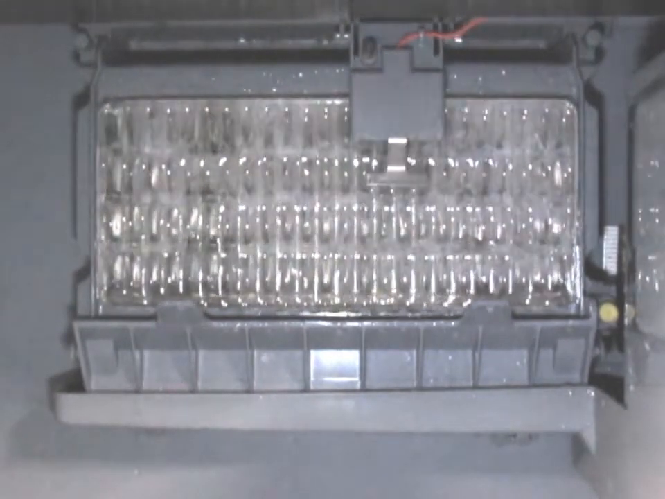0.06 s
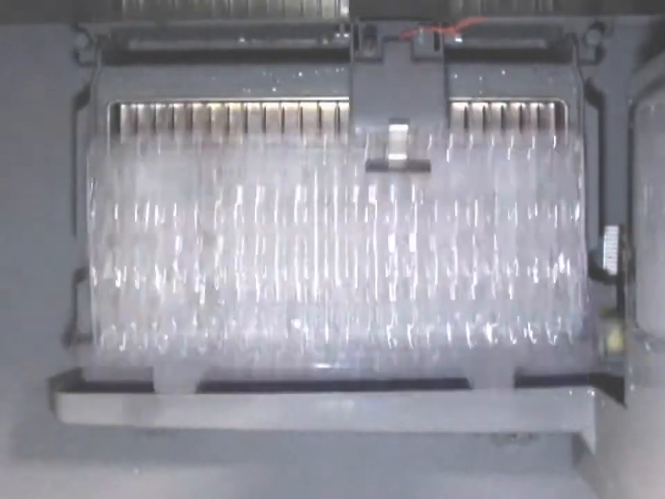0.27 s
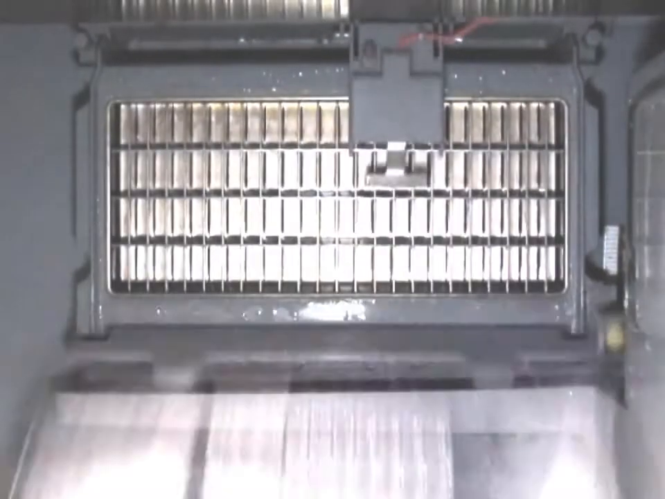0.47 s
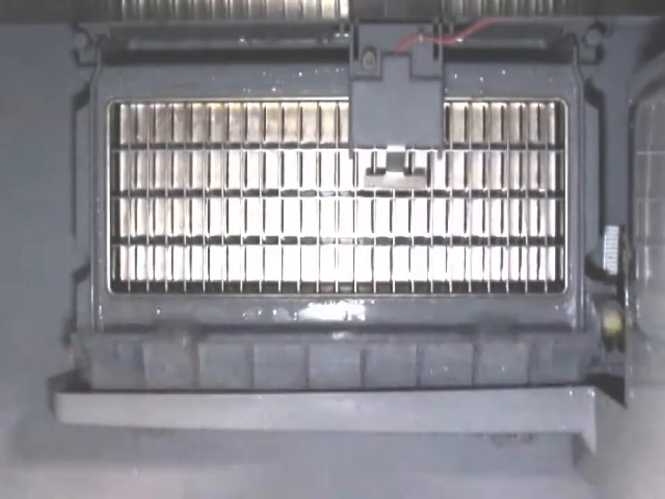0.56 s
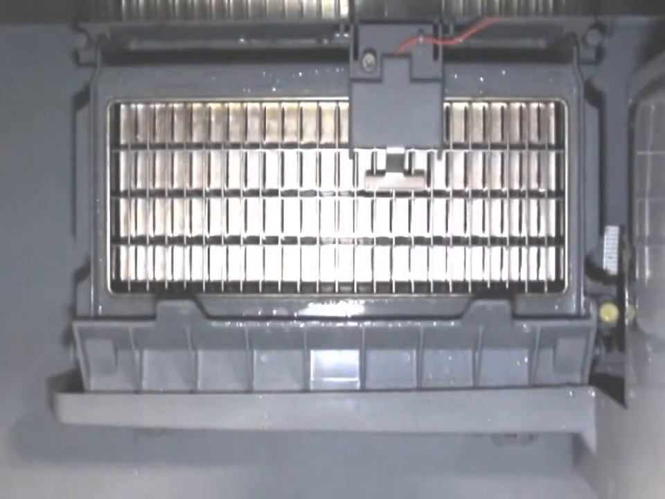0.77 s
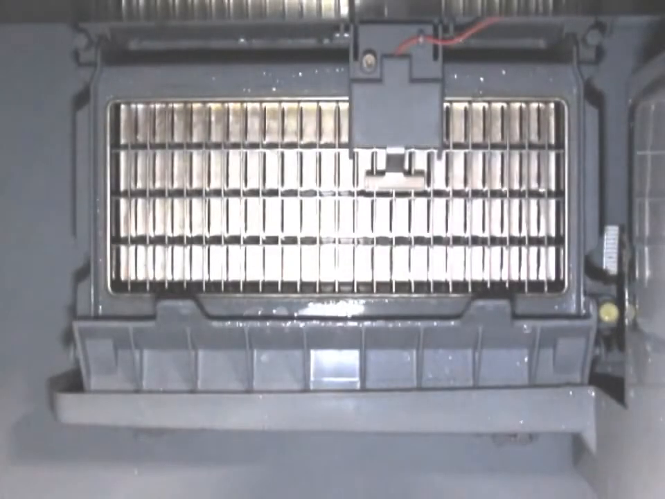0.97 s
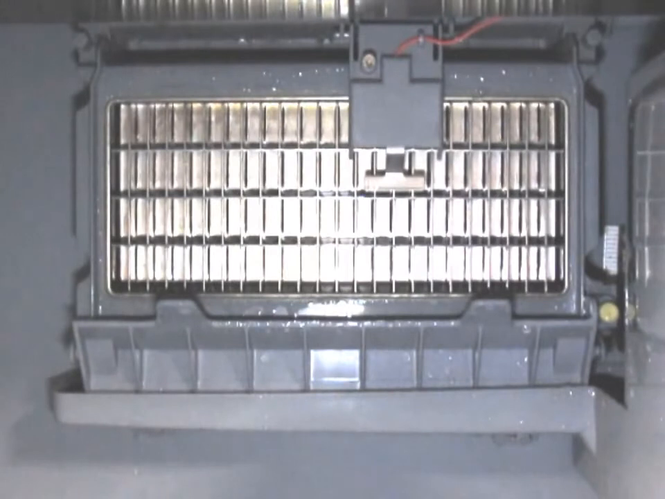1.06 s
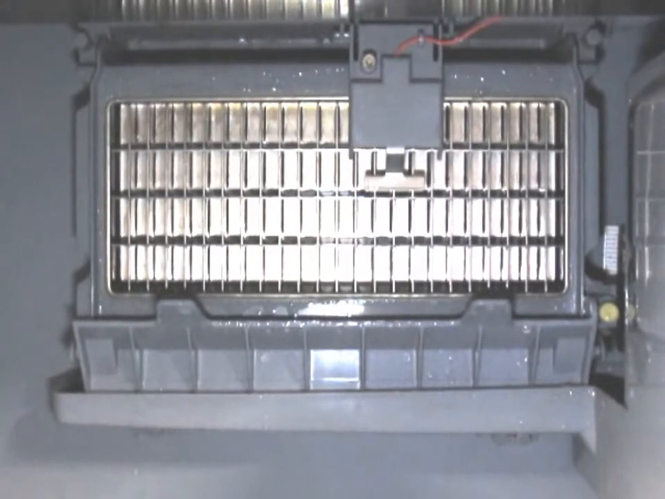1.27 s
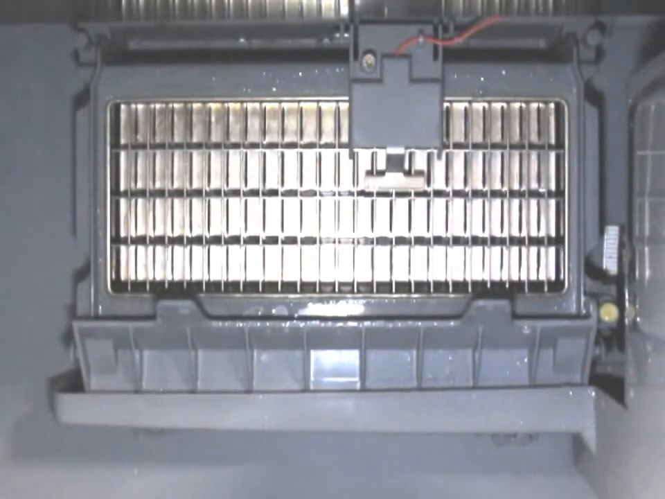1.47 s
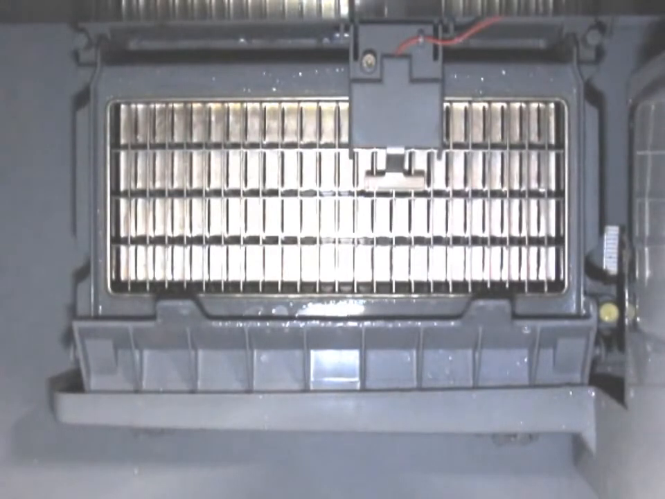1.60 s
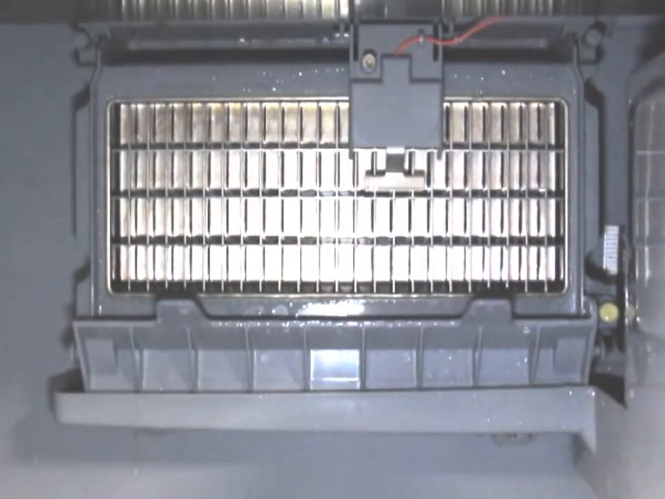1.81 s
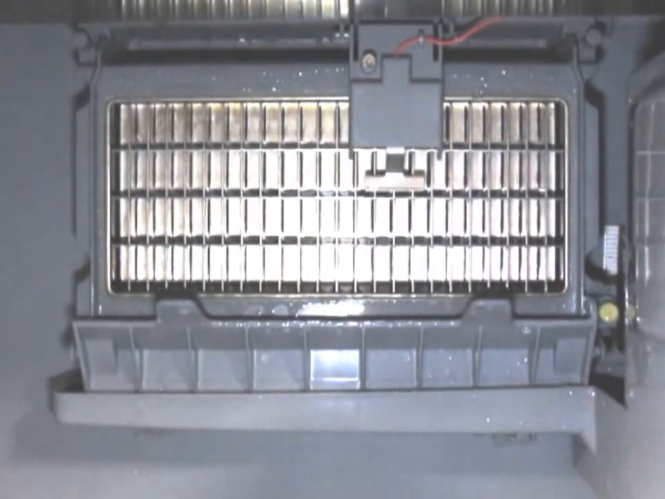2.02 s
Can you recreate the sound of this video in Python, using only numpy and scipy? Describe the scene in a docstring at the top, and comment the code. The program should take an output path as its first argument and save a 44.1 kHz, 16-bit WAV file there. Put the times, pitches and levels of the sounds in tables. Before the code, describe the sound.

Ice slab drops with hard cracks and hollow knocks, pieces rattling in a plastic bin, compressor humming.

```python
"""Inside an ice machine a slab of ice slides off its grid, knocks the flap and breaks up in the plastic bin.
Each blow is a noise crack, a ringing piece, a knock on the bin's resonances and a boom of two cabinet panels;
random contacts and short rings make the shower of clinking pieces. A compressor hums and buzzes throughout,
built from multiples of its shaft speed over hiss, beside two faint wavering tones made of narrow noise bands
and a thin fluttering tone that swells once. An automatic gain drops at the crash and creeps back."""
import sys
import numpy as np
from scipy import signal
from scipy.fft import rfft, irfft, next_fast_len
from scipy.io import wavfile
from scipy.ndimage import uniform_filter1d, map_coordinates

SR = 44100
rng = np.random.default_rng(int(sys.argv[2]) if len(sys.argv) > 2 else 0)


def generate_wav(sig):
    """Save sig (samples, or channels by samples) to the path in sys.argv[1] as 16-bit PCM at SR."""
    pcm = np.round(np.clip(np.atleast_2d(sig).T, -1, 1) * 32767).astype(np.int16)
    wavfile.write(sys.argv[1], SR, pcm)


N = 90404
T = np.arange(N) / SR  # time [s]
SIZE_DB = 4  # spread of impact sizes, standard deviation

# Resonances of the plastic bin: (frequency [Hz], width [Hz], level [dB])
BIN_MODES = [(246, 89, -3.5), (353.3, 22.6, 4.5), (519, 112, -1.5), (647.4, 38, 4.5), (822, 233, 1),
             (1050, 105, 2.5), (1211, 92, 2.5), (1440, 110, -4.5), (1480, 187, -4), (1777, 207, -1),
             (2010, 210, -8.5)]


def amp(db):
    """Amplitude factor of a level in dB."""
    return 10 ** (np.asarray(db) / 20)


def unit(x):
    """x scaled to rms 1."""
    return x / np.sqrt(np.mean(x ** 2) + 1e-20)


def along(points, hz):
    """Interpolates (Hz, value) points on a log frequency axis."""
    f, v = np.transpose(points)
    return np.interp(np.log(hz + 1), np.log(f + 1), v)


def filtered(x, response):
    """x shaped by a complex response of frequency, zero-padded by at least half a second."""
    m = next_fast_len(N + SR // 2)
    return irfft(rfft(x, m) * response(np.fft.rfftfreq(m, 1 / SR)), m)[..., :N]


def body(modes):
    """Causal response of a resonant body: damped modes (Hz, width, dB) summed with alternating sign."""
    def response(f):
        total = 0
        for k, (centre, width, db) in enumerate(modes):
            damping = 1j * f * width
            total = total + (-1) ** k * amp(db) * damping / (centre * centre - f * f + damping)
        return total
    return response


def colour(points):
    """Causal (minimum-phase) response with the given (Hz, dB) shape."""
    def response(f):
        cepstrum = irfft(np.log(np.maximum(amp(along(points, f)), 1e-6)))
        # fold the cepstrum onto positive time, so that nothing sounds before its impulse
        cepstrum[1:len(cepstrum) // 2] *= 2
        cepstrum[len(cepstrum) // 2 + 1:] = 0
        return np.exp(rfft(cepstrum))
    return response


def spread(a, b, alike):
    """Left and right as sum and difference of a and b, weighted by the likeness at each frequency."""
    def turn(hz):
        return np.arccos(np.clip(along(alike, hz), -1, 1)) / 2

    def weights(hz):
        return np.array([np.cos(turn(hz)), np.sin(turn(hz))])

    mid, side = filtered(np.array([a, b]), weights)
    return np.array([mid + side, mid - side])


def compressor():
    """A turning shaft sounds at multiples of its speed: low hum, a comb of buzz and whine, over steady hiss."""
    shaft_hz = 58.4  # mean speed, turns per second
    hum_db, buzz_db, whine_db, air_db = -54, -63.5, -82, -55.5
    whine_orders = [60, 75, 90]  # multiples of the shaft speed
    buzz_scatter_db = 6
    # Hum: (multiple of the shaft speed, level [dB])
    hum_orders = [(1, 6.5), (2, 2), (3, 2), (4, -3.5), (5, -26), (6, -9), (7, 1), (8, 2.5), (10, -10)]
    # Valve buzz, relative spectrum: (frequency [Hz], level [dB])
    buzz_spectrum = [(620, 0), (900, 3), (1200, -8), (1700, 7.5), (2100, -19), (3500, -5), (4700, -23),
                     (5300, -5), (6600, -3), (7400, -5), (7900, -46)]
    # Steady hiss of the machine, relative spectrum: (frequency [Hz], level [dB])
    air_spectrum = [(18, -43), (30, -0.5), (252, -7), (319, -12.5), (461, -7), (684, -20), (1190, -17.5),
                    (1720, -20), (2350, -31), (5900, -30.5), (7300, -26), (7800, -32.5), (12000, -33),
                    (13100, -32), (13700, -21), (14700, -30), (16000, -46)]
    # Stereo width of buzz and hiss: (frequency [Hz], left-right likeness)
    air_alike = [(60, 0.17), (240, 0.074), (950, 0.042), (3770, 0.81), (15000, 0.05)]

    drift = map_coordinates(rng.standard_normal(12), [T * 4])  # slow random wander
    phase = 2 * np.pi * (shaft_hz * T + 0.0016 * drift)
    hum = unit(sum(amp(db) * np.sin(k * phase + 2 * np.pi * rng.random()) for k, db in hum_orders))

    # one turn of the shaft as a waveform, read out again and again
    cycle = np.zeros(513, complex)
    k = np.arange(11, 262)
    scatter_db = buzz_scatter_db * rng.uniform(-0.75, 1, size=len(k))
    order_phase = 2 * np.pi * rng.random(len(k))
    cycle[k] = amp(along(buzz_spectrum, k * shaft_hz) + scatter_db) * np.exp(1j * order_phase)
    shape = irfft(np.pad(cycle, (0, 7680)))  # padded for a finely sampled turn
    buzz = unit(np.interp(phase / (2 * np.pi) % 1, np.arange(len(shape)) / len(shape), shape))
    wide_buzz = spread(buzz, np.roll(buzz, 277), air_alike)

    air = filtered(rng.standard_normal((2, N)), lambda hz: amp(along(air_spectrum, hz)))
    wide_air = unit(spread(*air, air_alike))

    whine = np.zeros(N)
    for order in whine_orders:
        flicker = amp(4 * map_coordinates(rng.standard_normal(20), [T * 8]))
        whine += flicker * np.sin(order * phase)
    return amp(hum_db) * hum + amp(whine_db) * whine + amp(buzz_db) * wide_buzz + amp(air_db) * wide_air


def wavering_tones():
    """Narrow bands of noise near 257 and 1214 Hz waver like faint tones."""
    # Wavering tones: (frequency [Hz], width [Hz], level [dB])
    tones = [(257, 46, -64), (1214, 18, -72.5)]
    out = np.zeros(N)
    for hz, width, db in tones:
        band = filtered(rng.standard_normal(N), lambda f: np.exp(-((f - hz) / width) ** 2))
        out += amp(db) * unit(band)
    return out


def thin_tone():
    """A thin tone of steady pitch flutters at random and swells once."""
    pitch_hz, level_db = 2580, -76
    swell_s, span_s = 1.5, 0.11  # time of the swell and its half-width
    flutter = amp(3.5 * map_coordinates(rng.standard_normal(80), [T * 35]))
    swell = 0.25 + np.exp(-((T - swell_s) / span_s) ** 2)
    return amp(level_db) * swell * flutter * np.sin(2 * np.pi * pitch_hz * T)


def contacts(per_s):
    """Random tiny impacts of uneven size and either sign, rms 1."""
    hit = rng.random(N) < per_s / SR
    return unit(hit * rng.choice([-1, 1], size=N) * amp(SIZE_DB * rng.standard_normal(N)))


def clinks():
    """Loose pieces ring briefly, each at its own pitch, higher ones dying sooner; rms 1."""
    per_s, cycles = 900, 45  # cycles: periods until a ring has fallen by 60 dB
    centre_hz, pitch_spread = 2873, 0.55  # spread in natural log of frequency
    draw = rng.standard_normal((2000, 2))[:int(per_s * N / SR)]
    start = rng.integers(0, N, size=2000)[:len(draw), None]
    t = np.arange(1200)  # samples since the contact
    hz = np.clip(centre_hz * np.exp(pitch_spread * draw[:, :1]), 700, 13000)
    fall = amp(SIZE_DB * draw[:, 1:] - 60 * t * hz / SR / cycles)
    onset = np.minimum(t / 40, 1)
    ring = fall * np.sin(2 * np.pi * hz * t / SR) * onset
    return unit(np.bincount((start + t).ravel(), ring.ravel())[:N])


def shower():
    """Many small contacts: chips hiss and clink, lumps excite the walls of the bin."""
    chips_per_s, lumps_per_s, clink_db = 3500, 1100, -1  # clinks relative to the chip hiss
    # Level of the shower over time: (time [s], small chips [dB], heavy lumps [dB])
    course = [(0.202, -64, -35), (0.214, -61, -17), (0.24, -36.5, -42.5), (0.266, -35, -31),
              (0.289, -54, -34), (0.297, -16.5, -15), (0.322, -74, -43), (.345, -44.5, -29.5),
              (0.38, -48, -36), (0.418, -28, -16), (0.432, -25, -33), (0.451, -59, -25.5), (0.47, -36, -28),
              (0.545, -51, -46), (0.554, -28, -19), (0.575, -46.5, -36.5), (0.599, -20, -16),
              (0.667, -33.5, -24.5), (.72, -29, -24), (.755, -28, -25.5), (.81, -34.5, -27),
              (.85, -38.5, -29.5), (0.926, -44, -34), (0.954, -34, -34), (0.984, -28, -33.5),
              (1.008, -44.5, -38.5), (1.03, -40, -51), (1.071, -55.5, -48.5), (1.15, -64.5, -64),
              (1.26, -73.5, -78)]
    # Hiss of the chips, relative spectrum: (frequency [Hz], level [dB])
    chip_spectrum = [(530, -30), (900, -7.5), (1230, -8.5), (1490, -9), (1850, -3.5), (2330, -10),
                     (3300, -14), (9420, -22.5), (16000, -31)]
    s, chips_db, lumps_db = np.transpose(course)

    def level(db):
        return amp(np.interp(T, s, db, left=-120, right=-120))

    hiss = unit(filtered(contacts(chips_per_s), colour(chip_spectrum)))
    chips = hiss + amp(clink_db) * clinks()
    lumps = filtered(level(lumps_db) * contacts(lumps_per_s), body(BIN_MODES))
    steady_lumps = filtered(contacts(lumps_per_s), body(BIN_MODES))  # reference loudness
    return level(chips_db) * chips + lumps / np.std(steady_lumps)


def blows():
    """Each blow cracks, rings the struck piece, knocks the bin and pushes two panels of the cabinet."""
    piece_t60_s, piece_rise_s = 0.054, 0.007
    push_s, soft_s = 0.0017, 0.0019  # panel push; contact of a soft blow
    crush_s, splinter_db = 0.0051, -7.5  # rise of a soft crack; splinters relative to the crack noise
    tick_db, tick_t60_s = 5, 0.004  # first contact of the hardest blow, over its crack
    deep_panel, high_panel = (87, 26), (124, 22)  # (frequency [Hz], width [Hz])
    # Blows: (time [s], crack [dB], knock on the bin [dB], deep panel boom [dB], high panel boom [dB],
    # pitch of the struck piece [Hz], its ring [dB], crack t60 [s], hardness [0-1])
    hits = [ (0.2085, -19, -18.5, -13.5, -7, 397, -7, 0.077, 0),
            (0.2306, -9.5, -10.5, -55, -45, 280, -0.5, 0.046, 0.12),
            (0.2912, -6.5, -13, -19, -47, 541, -3.5, 0.048, 1),
            (0.3311, -40, -18.5, -17, -27, 624, -29, 0.086, 0.4),
            (0.3864, -21, -20, -26, -37, 940, -22, 0.089, 0.25),
            (0.3997, -17.5, -36, -58, -36, 517, -22, 0.058, 0.72),
            (.411, -10, -13.5, -16.5, -46, 330, -6.5, 0.092, 0.11),
            (0.432, -37, -28.5, -16.5, -31, 362, -10.5, 0.09, 0.3),
            (0.4595, -18, -14, -36, -20.5, 511.6, 0.5, 0.058, 0.44),
            (0.4817, -27, -13.5, -25.5, -27, 352, -11.5, 0.026, 0.1),
            (0.5071, -35.5, -18.5, -29, -27, 364, -20, 0.073, 0.46),
            (0.5515, -23.5, -15, -18.5, -43, 415, -10.5, 0.15, 0.73),
            (0.562, -21.5, -25.5, -18.5, -17.5, 850, -31, 0.21, 0.8),
            (.5895, -13.5, -12.5, -45, -44, 386, -33, 0.07, 0.36),
            (.608, -11, -29, -38, -18.5, 1241, -3.5, 0.054, 0.37),
            (0.6172, -24, -30, -39, -46, 337, -8.5, 0.034, 0.2),
            (0.6462, -22.5, -43, -20, -21, 290, -7, 0.18, 0.4),
            (0.7106, -18, -25, -47, -28, 1274, -8, 0.031, 0.2),
            (0.745, -17, -11.5, -51, -32, 800, -15, 0.044, 0.9),
            (0.7841, -19, -50, -29.5, -34, 1606, -15, 0.044, 1),
            (0.8203, -38, -24, -32.5, -46, 391, -7.5, 0.034, 0),
            (0.8547, -26.5, -12, -53, -36, 866, -15.5, 0.031, 0.84),
            (0.945, -21, -20.5, -35.5, -46, 594, -15, 0.067, 0.51),
            (1.024, -45, -37, -47, -47, 385, -32, 0.073, 0.6)]
    # Noise of a crack, relative spectrum: (frequency [Hz], level [dB])
    crack_spectrum = [(710, -23.5), (1200, -5.5), (1770, 1), (2800, -18), (3800, -10), (5200, -15.5),
                      (7500, -14.5), (10600, -17.5), (12000, -22), (16000, -51)]

    crack, ring, knock, deep, high = np.zeros((5, N + SR))
    t = np.arange(SR // 4) / SR
    push = np.sin(np.pi * np.clip(t / push_s, 0, 1))
    push = push / push.sum()
    for s, crack_db, knock_db, deep_db, high_db, hz, ring_db, t60, hard in hits:
        at = slice(round(s * SR), round(s * SR) + len(t))
        # hard blows start at once with a tick, soft ones build up as the ice crushes
        rise = 1 - (1 - hard) * np.exp(-t / crush_s)
        tick = np.clip(hard, 0, 1) * amp(tick_db - 60 * t / tick_t60_s)
        fall = amp(-60 * t / t60) * rise + tick
        crack[at] += amp(crack_db) * fall / 2

        piece = amp(ring_db - 60 * t / piece_t60_s) * np.sin(2 * np.pi * hz * t)
        ring[at] -= piece * (1 - np.exp(-t / piece_rise_s))

        # softer contact blurs the force, so it excites less treble
        rough = rng.standard_normal(len(t))
        blurred = unit(np.convolve(rough, np.hanning(int(soft_s * SR) + 3), "same"))
        force = fall * (hard * rough + (1 - hard) * blurred)
        knock[at] += amp(knock_db) * force / np.linalg.norm(force)
        deep[at] -= amp(deep_db) * push
        high[at] -= amp(high_db) * push

    impulse = np.eye(1, N)[0]

    def struck(x, response):
        return filtered(x[:N], response) / np.abs(filtered(impulse, response)).max()

    def panel(mode):
        return lambda f: body([(*mode, 0)])(f) ** 2  # the resonance twice over: a slower swell

    noise = filtered(crack[:N] * rng.standard_normal(N), colour(crack_spectrum))
    noise = noise / np.linalg.norm(filtered(impulse, colour(crack_spectrum)))
    splinters = amp(splinter_db) * crack[:N] * clinks()
    ice = noise + splinters + ring[:N] + struck(knock, body(BIN_MODES))
    boom = struck(deep, panel(deep_panel)) + struck(high, panel(high_panel))
    return ice, boom


def inside(x):
    """The closed machine answers with decaying noise; a new tail every tenth of a second."""
    # Decay inside the machine: (frequency [Hz], t60 [s])
    decay = [(150, 0.28), (1000, 0.12), (12000, 0.15)]
    out, step = np.zeros((2, N + SR)), SR // 10
    for i in range(0, N - step, step):
        hz, t, z = signal.stft(rng.standard_normal((2, SR // 3)), SR, nperseg=256)
        fall = amp(-60 * t / along(decay, hz)[:, None])
        tail = signal.istft(z * fall, SR, nperseg=256)[1]
        wet = signal.fftconvolve(x[None, i:i + step], tail / np.linalg.norm(tail[0]), axes=1)
        out[:, i:i + wet.shape[1]] += wet
    return out[:, :N]


def scene():
    """The ice crash and its answer inside the machine, over compressor, wavering tones and thin tone."""
    inside_db = -5  # level of the answer in the middle
    # Stereo width of the crash: (frequency [Hz], left-right likeness)
    crash_alike = [(60, 0.33), (180, 0.94), (550, 0.8), (1650, 0.39), (4970, 0.77), (15000, 0.17)]
    machine = compressor() + wavering_tones() + thin_tone()
    ice, boom = blows()
    ice = ice + shower()
    near, far = inside(ice)
    crash = spread(ice + boom + amp(inside_db) * near, far, crash_alike)
    return crash + machine


def record(dry):
    """Automatic gain drops fast on loud sound and returns slowly; deep bass and the top band are cut."""
    rest_db, loud_db, depth_db = 11.5, -42, 13.5  # resting gain, threshold, deepest reduction
    return_db_per_s, grip_s = 4.5, 0.0084  # slow return; smoothing of the gain
    bass_cut_hz, top_hz = 50, 15800
    power = uniform_filter1d(np.mean(dry ** 2, 0), SR // 100)
    level_db = 10 * np.log10(np.abs(power) + 1e-12)
    need_db = np.clip(loud_db - level_db, -depth_db, 0)
    # hold the lowest gain needed so far, rising at the return rate
    creep_db = return_db_per_s * T
    gain_db = np.minimum(np.minimum.accumulate(need_db - creep_db) + creep_db, 0)
    gain_db = uniform_filter1d(gain_db, max(int(grip_s * SR), 1))
    bass_cut = signal.butter(4, bass_cut_hz, "high", fs=SR, output="sos")
    levelled = signal.sosfilt(bass_cut, dry) * amp(rest_db + gain_db)
    return filtered(levelled, lambda hz: hz < top_hz)


dry = scene()
out = record(dry)
generate_wav(out)
```